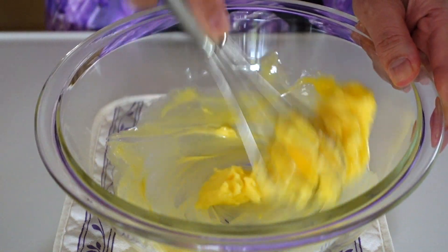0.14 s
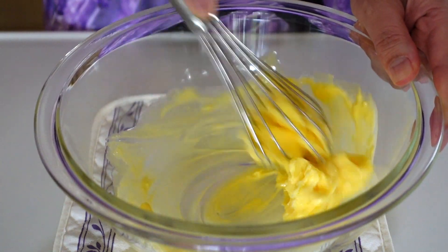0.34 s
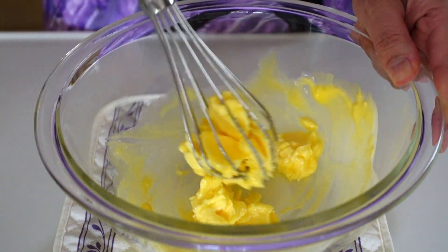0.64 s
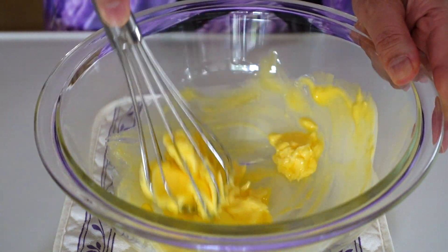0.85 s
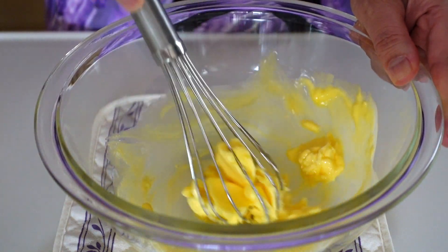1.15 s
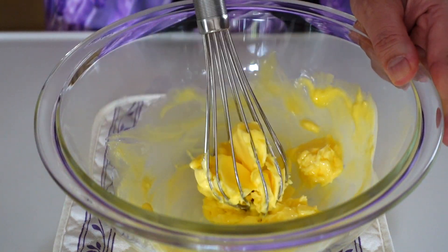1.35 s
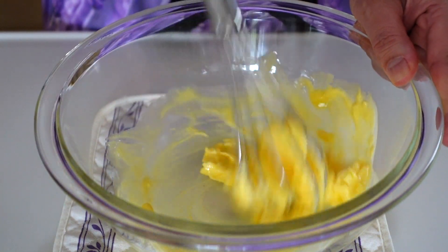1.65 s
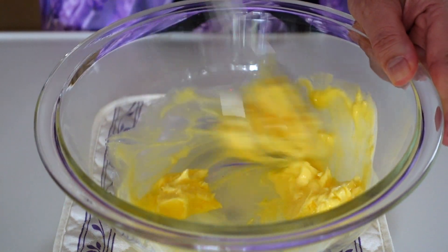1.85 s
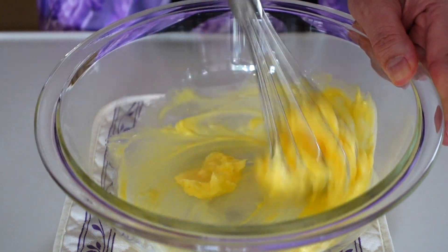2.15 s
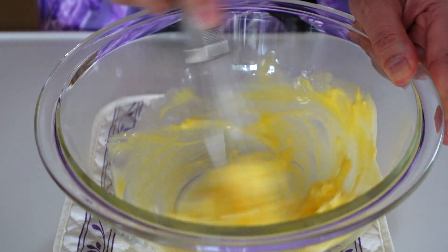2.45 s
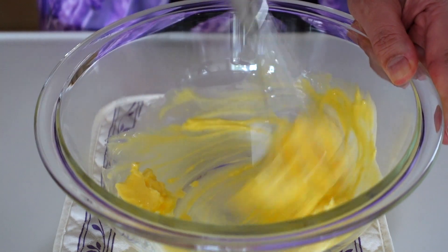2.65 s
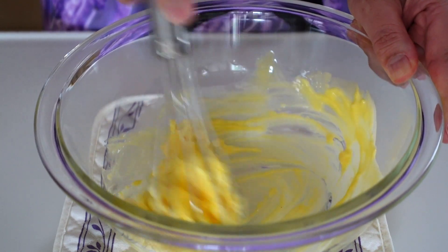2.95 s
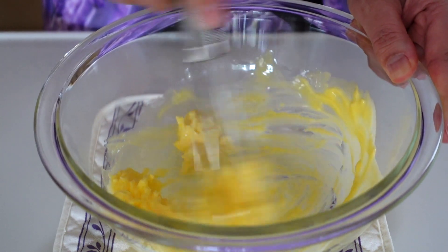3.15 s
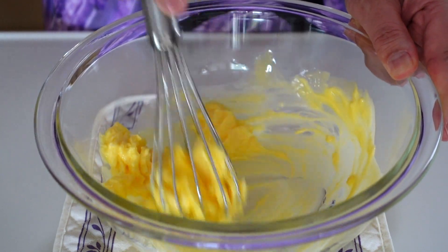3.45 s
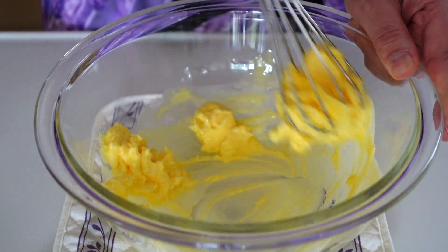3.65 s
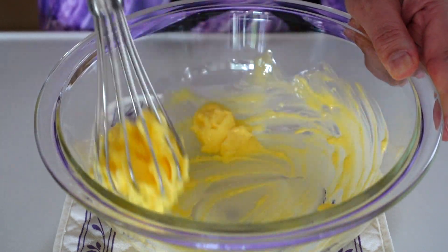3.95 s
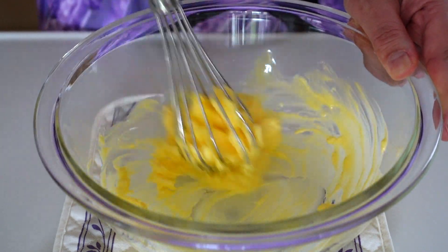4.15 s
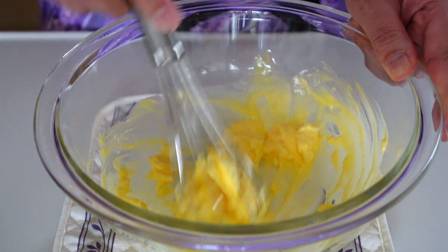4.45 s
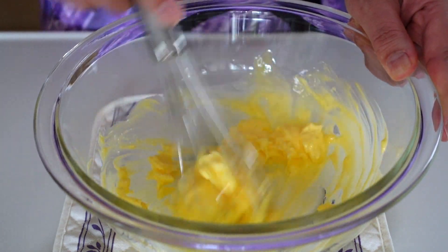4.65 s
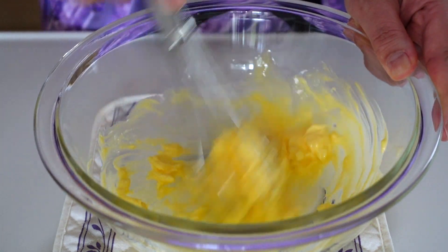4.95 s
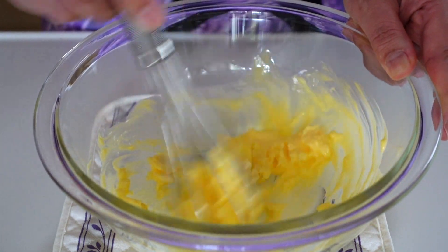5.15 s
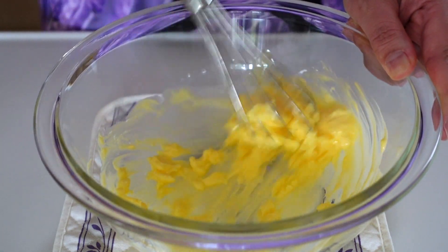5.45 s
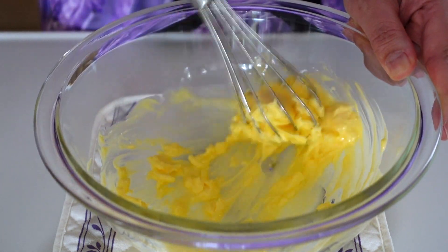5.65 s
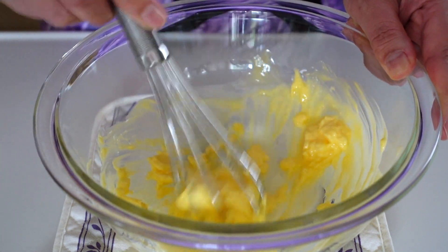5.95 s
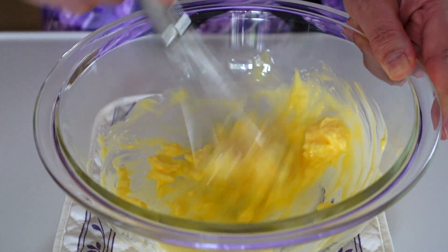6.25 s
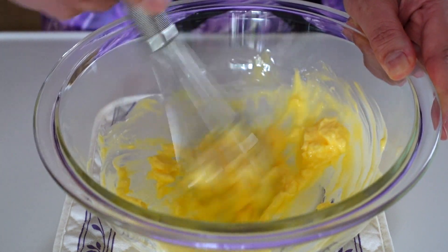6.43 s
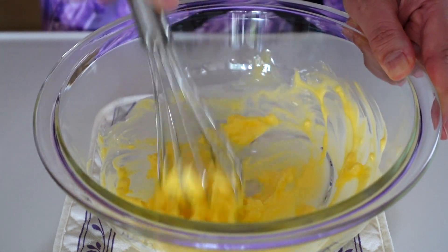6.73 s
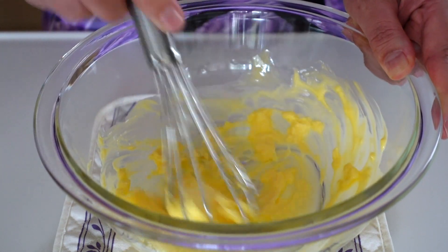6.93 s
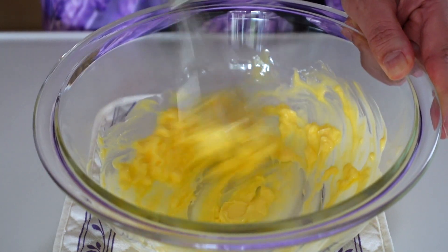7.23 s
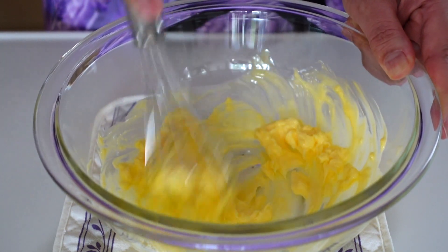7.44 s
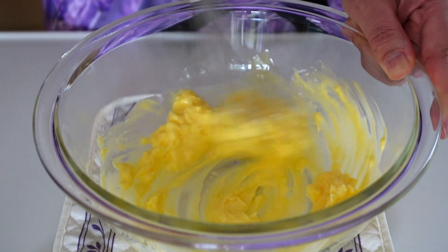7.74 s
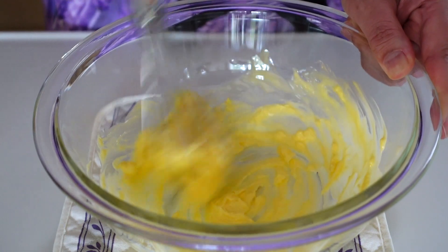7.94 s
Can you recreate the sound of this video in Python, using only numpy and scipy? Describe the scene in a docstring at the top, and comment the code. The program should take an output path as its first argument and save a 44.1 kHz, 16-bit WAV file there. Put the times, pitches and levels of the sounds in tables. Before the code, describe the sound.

Steel whisk beats butter in a glass bowl in quick bursts, with wet smearing, crackling pops, glassy knocks and one clear clink.

```python
"""First comes a soft kitchen hum with a faint tone, and at once a steel balloon whisk creaming butter in a glass bowl.
The wires smear and crackle: noise and tiny air pockets follow each sweep. Bigger pockets snap open and ring briefly.
The whisk rubs and knocks the glass, once with a clear clink: decaying bowl notes under a rattle of wire contacts.
The table shakes dully through a cloth mat and thumps at the hardest shoves; reflections surround the bowl's sound."""
import sys
import numpy as np
from scipy import signal
from scipy.fft import rfft, irfft, next_fast_len
from scipy.io import wavfile
from scipy.ndimage import uniform_filter1d, map_coordinates

SR = 44100
rng = np.random.default_rng(int(sys.argv[2]) if len(sys.argv) > 2 else 0)


def wrap_up_sound(samples):
    """Save the sound to the file named by the first command line argument, as 16-bit audio."""
    columns = np.atleast_2d(samples).T
    # keep every value between -1 and 1, then stretch to whole-number steps
    tamed = np.clip(columns, -1, 1)
    steps = np.round(tamed * 32767).astype(np.int16)
    wavfile.write(sys.argv[1], SR, steps)


N = 356769


def amp(db):
    """Turn decibels into a gain."""
    return 10 ** (np.asarray(db) / 20)


def unit(x):
    """Scale to an average strength (rms) of 1."""
    return x / np.sqrt(np.mean(x ** 2) + 1e-20)


def along(points, hz):
    """Read (Hz, value) points at any frequency, on a log axis."""
    f, v = np.transpose(points)
    return np.interp(np.log(hz + 1), np.log(f + 1), v)


def wobble(rate):
    """A smooth random curve with this many random points a second."""
    return map_coordinates(rng.standard_normal(8192), [np.arange(N) * rate / SR], mode="wrap")


def filtered(x, response):
    """Shape a sound by a gain that depends on frequency."""
    size = next_fast_len(N + SR // 4)
    hz = np.fft.rfftfreq(size, 1 / SR)
    return irfft(rfft(x, size) * response(hz), size)[..., :N]


def coloured(x, spectrum):
    """Give a sound a spectrum of (Hz, dB) points, at rms 1."""
    return unit(filtered(x, lambda hz: amp(along(spectrum, hz))))


def placed(times, sounds):
    """Add up short sounds, one per row, at their start times in seconds."""
    at = np.round(np.abs(times) * SR).astype(int)[:, None] + np.arange(sounds.shape[1])
    return np.bincount(at.ravel(), sounds.ravel(), N)[:N]


def resonance(f, centre_hz, width_hz):
    """The response of one resonance, with a peak gain of 1."""
    spread = 1j * f * width_hz
    return spread / (centre_hz ** 2 - f ** 2 + spread)


def ringing(modes, gains_db, t):
    """Decaying notes of slightly random strength; the moving whisk and butter unsettle their pitch."""
    hz, level, t60 = np.transpose(modes)
    strength = amp(level + gains_db + rng.standard_normal(len(hz)))
    unsteady, drift_rate = .005, 130  # share of the pitch, changes a second
    knots = rng.standard_normal((len(hz), 128))
    drift = np.array([np.interp(t * drift_rate, np.arange(128), row) for row in knots])
    cycles = np.cumsum(hz[:, None] * (1 + unsteady * drift), axis=1) / SR
    cycles = cycles + rng.random((len(hz), 1))  # random starting phase
    fade = amp(-60 * t / t60[:, None])
    return strength @ (fade * np.sin(2 * np.pi * cycles))


def swells(times, levels_db, length_s, skew):
    """Power of overlapping movements that build and die away; a skew above 1 makes the fall slower than the rise."""
    t = np.arange(0, N, 32) / SR  # a coarse time grid is enough
    power = 1e-12
    for s, db, length in zip(times, levels_db, np.broadcast_to(length_s, len(times))):
        age = 2 * (t - s) / length * np.where(t < s, skew, 1 / skew)
        power = power + (amp(db) / np.cosh(np.clip(age, -20, 20))) ** 2
    return np.interp(np.arange(N) / SR, t, power)


# Steady kitchen air. Each row: pitch in Hz, relative strength in dB per Hz.
HUM_COLOUR = [(15, -84), (25, -49), (70, -24.5), (165, -7.5), (200, -8.5), (372, -6.5), (418, -6.5),
              (667, -9), (707, -8), (1200, -5), (1480, -3), (1630, -13.5), (2020, -6), (2270, -19),
              (2600, -73), (3380, -81), (5720, -120)]
# The faint hiss. Each row: pitch in Hz, relative strength in dB per Hz.
HISS_COLOUR = [(1000, -33), (2400, 7.5), (4300, 5), (8000, -1), (12000, -6), (15000, -7.5), (16000, -10)]
# How alike the two ears are. Each row: pitch in Hz, likeness (1 same, 0 unrelated, negative opposed).
EAR_LIKENESS = [(60, 0.92), (150, 0.27), (380, 0.24), (950, -0.32), (2400, -0.14), (6000, 0.051),
                (15000, 1)]


def background(hum_db=-61.0, hiss_db=-70.0):
    """Steady kitchen ventilation and a faint hiss: two noises mixed to be partly alike in both ears."""
    hum = amp(hum_db) * coloured(rng.standard_normal((2, N)), HUM_COLOUR)
    hiss = amp(hiss_db) * coloured(rng.standard_normal((2, N)), HISS_COLOUR)

    def shares(hz):
        turn = np.arccos(np.clip(along(EAR_LIKENESS, hz), -1, 1)) / 2
        return np.array([np.cos(turn), np.sin(turn)])

    mid, side = filtered(hum + hiss, shares)
    return np.array([mid + side, mid - side])


# The appliance tone's level, before its waver. Each row: time in seconds, level in dB.
DRONE_LEVEL = [(0, -75.5), (1.7, -71), (2.8, -79), (4.8, -99), (6.2, -75.5), (8, -98)]


def drone(hz=420, waver_db=3.5):
    """A faint appliance tone: a sine whose level and phase wander slowly."""
    s, level_db = np.transpose(DRONE_LEVEL)
    db = np.interp(np.arange(N) / SR, s, level_db)
    phase = 2 * np.pi * hz * np.arange(N) / SR + 1.5 * wobble(6)
    return amp(db + waver_db * wobble(4.95)) * np.sin(phase)


# Sweeps of the wires through the butter, about ten a second when beating.
# Each row: time of the peak in seconds, level in dB, length in seconds, treble over body in dB.
SWEEPS = [(0.01, -56.5, 0.054, 9.5), (0.135, -61, 0.09, 14), (0.232, -58.5, 0.059, 8),
          (0.363, -59.5, 0.043, 14), (0.44, -59.0, 0.075, 2), (0.541, -67.5, 0.071, -10),
          (1.54, -73, 0.083, 6), (1.706, -58, 0.045, 5), (1.869, -62.5, 0.049, 14), (1.949, -58, 0.054, 8),
          (2.126, -59, 0.061, 6), (2.216, -52, 0.045, -3), (2.345, -56, 0.036, 0.5),
          (2.393, -60.5, 0.039, -4), (2.495, -53, 0.042, 2), (2.59, -58, 0.03, 3), (2.665, -56, 0.042, -4),
          (2.724, -55.5, 0.031, 8), (2.832, -53.5, 0.034, 16.5), (2.96, -47.5, 0.036, -1),
          (3.056, -53.5, 0.054, 8.5), (3.174, -49.5, 0.063, 3), (3.291, -59.5, 0.045, 10),
          (3.347, -56.5, 0.036, -14), (3.397, -53.5, 0.063, 5), (4.251, -63.5, 0.063, 2),
          (4.342, -67.5, 0.018, 15), (4.456, -54, 0.054, 4), (4.572, -53.5, 0.045, 14),
          (4.635, -55.5, 0.036, 4), (4.741, -60, 0.027, -12), (4.838, -50.5, 0.033, -3),
          (4.894, -54, 0.036, -20), (5.014, -52, 0.036, 0), (5.083, -50, 0.036, 5),
          (5.184, -46.5, 0.036, 0.5), (5.264, -56.5, 0.041, -13), (5.39, -56, 0.045, -4),
          (5.467, -52.5, 0.045, -1), (5.58, -56, 0.036, 4), (5.667, -52.5, 0.03, 3.5),
          (5.77, -51.5, 0.045, -1.5), (5.876, -52.5, 0.042, -8), (5.946, -56.5, 0.036, -4),
          (6.073, -57.5, 0.049, 3.5), (6.144, -61, 0.036, 6), (6.206, -56.5, 0.036, -2),
          (6.322, -57, 0.033, -1), (6.404, -54.5, 0.032, 1), (6.496, -54, 0.04, -9), (6.585, -55, 0.036, 1),
          (6.695, -55.5, 0.045, 5), (6.829, -55.5, 0.039, 6), (6.936, -51, 0.054, -9.5),
          (7.057, -51.5, 0.054, 2), (7.164, -53.5, 0.031, 7), (7.286, -56.5, 0.039, 3),
          (7.367, -54, 0.032, 3), (7.425, -55, 0.027, -20), (7.523, -53, 0.032, 4.5),
          (7.638, -54, 0.045, -5), (7.777, -51, 0.036, 0), (7.888, -49.5, 0.045, -1),
          (7.986, -50.5, 0.045, -1), (8.073, -59, 0.045, -6)]


def sweeping(skew=0.92, cling_db=-15.5, cling_s=.2):
    """Each sweep drags the butter, which clings to the wires around it: drag and brightness in dB over time."""
    s, db, length, bright_db = np.transpose(SWEEPS)

    def power(level):
        return swells(s, level, length, skew) + swells(s, level + cling_db, cling_s, skew)

    drag, treble = power(db), power(db + bright_db)
    return 10 * np.log10([drag, treble / drag])


def cavity(hz, life, glide, size):
    """Small air cavities, one per row: they swell to 1, can glide up in pitch and die within a few cycles."""
    cycles = hz[:, None] * np.arange(size) / SR
    age = cycles / np.maximum(life, .4)[:, None]
    swell = (age / 2) ** 2 * np.exp(2 - age)
    return swell * np.sin(2 * np.pi * cycles * (1 + glide * np.tanh(age / 2 - 1)))


def softened(x, low_hz=900, high_hz=12500):
    """Tiny sources radiate little bass, and grease dulls the very top."""
    return filtered(x, lambda f: (1j * f / (1j * f + low_hz)) ** 2 / (1 + (f / high_hz) ** 10))


def patchy(depth_db):
    """Noise whose colour shifts from moment to moment, as gaps of every size open and close."""
    z = signal.stft(rng.standard_normal(N), nperseg=256)[2]
    field = uniform_filter1d(rng.standard_normal(z.shape), size=7, axis=0)  # smooth over pitch
    field = uniform_filter1d(field, size=4, axis=1)  # smooth over time
    return signal.istft(z * amp(depth_db * unit(field)), nperseg=256)[1][:N]


# The glass bowl, damped by butter and a hand.
# Each row: note in Hz, relative level in dB, seconds to fade by 60 dB.
BOWL_NOTES = [(490, -15, .09), (560, -10, .12), (680, -15, .06), (785, -10, .14), (915, -11, .06),
              (1180, -9, .06), (1470, -6, .04), (1590, -10, .028), (1740, -10, .03), (1986, -12, .035),
              (2800, -16, .025), (3270, -15, .035), (3720, -4, .04), (4414, -17, .025), (5350, -13, .025),
              (5900, -16, .025), (7000, -14, .03), (8030, -14, .04), (8770, -13, .04), (9595, -12, .045),
              (10420, -19, .035), (11400, -14, .035)]


def through_glass(x):
    """Scraping stirs the bowl's notes above 4 kHz, which tint the sound faintly."""
    glass_db, width_hz = -10, 140
    notes = [(hz, db) for hz, db, t60 in BOWL_NOTES if hz > 4000]
    glass = filtered(x, lambda f: sum(amp(db) * resonance(f, hz, width_hz) for hz, db in notes))
    return unit(x + amp(glass_db) * unit(glass))


# Colour of the wet hiss. Each row: pitch in Hz, relative strength in dB per Hz.
SMEAR_COLOUR = [(900, -31), (1500, 3.5), (2000, 3), (2700, 0.5), (4300, 3), (6000, -6.5), (7500, -3.5),
                (9700, -3), (12500, -11), (14500, -14), (16000, -40)]


def smear(drag_db):
    """Wires tear through the butter: a fluttering wet hiss and a crackle of countless tiny pockets."""
    hiss_db, flutter_db, patchy_db = -3, 5.5, 2
    crackle_db, size_db, count = -1.0, 5.0, 3600
    grain_hz, spread = 5400, 0.25  # typical pocket pitch, its spread as a log ratio
    when = rng.uniform(0, N / SR, count)
    pitch = np.clip(grain_hz * np.exp(spread * rng.standard_normal(count)), 1500, SR / 4)
    big = np.minimum(rng.exponential(1, count), np.pi)
    life = rng.uniform(.3, .8, count)
    grains = cavity(pitch, life, glide=0, size=160) * amp(size_db * big)[:, None]
    crackle = unit(softened(placed(when, grains)))
    hiss = unit(coloured(patchy(patchy_db), SMEAR_COLOUR) * amp(flutter_db * wobble(110)))
    return amp(drag_db) * through_glass(amp(hiss_db) * hiss + amp(crackle_db) * crackle)


def small_pops(drag_db, over_db=11.5, pitch_hz=5500, spread=0.33, life=0.76, crowding=0.56, count=170):
    """Lesser pockets burst at random, more often and louder the harder the wires sweep."""
    tear_db, tear_hz, life_spread, size = -12, 10500, .35, 300
    swept = np.cumsum(amp(crowding * drag_db))
    share = (np.arange(count) + rng.random(count)) / count
    at = np.searchsorted(swept / swept[-1], share)  # harder sweeps take more of the pockets
    hz = np.clip(pitch_hz * np.exp(spread * rng.standard_normal(count)), 1500, SR / 4)
    lives = life * np.exp(life_spread * rng.standard_normal(count))
    ring = cavity(hz, lives, glide=0, size=size)
    tear = amp(tear_db) * cavity(np.full(count, tear_hz), np.full(count, .45), glide=0, size=size)
    return softened(placed(at / SR, (ring + tear) * amp(drag_db[at] + over_db)[:, None]))


def tilted(x, bright_db, pivot_hz=5300):
    """Thin films of butter tear brightly, thick lumps dully: treble and body tip about a pivot."""
    body = filtered(x, lambda hz: 1 / (1 + (hz / pivot_hz) ** 6))
    return body * amp(-bright_db / 2) + (x - body) * amp(bright_db / 2)


# The whisk bearing down on the bowl.
# Each row: time of the peak in seconds, rub on the glass in dB, push on the table in dB (before each sound's own gain).
BEARING_DOWN = [(.04, -62, -89), (.18, -67, -71), (.23, -55, -67.5), (.42, -56, -69.5), (1.67, -61.5, -88),
                (1.8, -58, -81), (2.72, -70, -77.5), (2.87, -60, -82), (3.02, -79, -69), (3.12, -56, -74),
                (3.25, -70, -71), (3.36, -55, -68), (4.21, -56.5, -75), (4.44, -61.5, -70),
                (4.54, -68, -72), (4.64, -60, -78), (4.88, -60, -72), (5.01, -79, -70), (5.18, -63, -66.5),
                (5.26, -66, -69), (5.36, -58.5, -75), (5.47, -62, -77), (5.55, -56, -75),
                (5.94, -59.5, -71), (6.13, -57.5, -78), (6.29, -59, -73), (6.45, -56, -72),
                (6.55, -61.5, -88), (6.95, -69, -65), (7.16, -59, -68), (7.364, -54.5, -66.5),
                (7.59, -57, -71.5), (7.69, -55, -67), (7.8, -66, -74), (7.905, -51.5, -60.5),
                (7.97, -56, -76), (8.05, -56.5, -70)]


def shoving(drag_db):
    """Shoves load the bowl, and every sweep adds a little: rub and table push in dB over time."""
    rub_s, push_s, push_lag_s, skew = 0.049, 0.066, 0.012, 1.6  # the table answers later and longer
    slide_rub_db, slide_push_db = -10, -28.5  # a sweep's own share, relative to its drag
    s, rub_db, push_db = np.transpose(BEARING_DOWN)
    rub = swells(s, rub_db, rub_s, skew) + amp(drag_db + slide_rub_db) ** 2
    push = swells(s + push_lag_s, push_db, push_s, skew) + amp(drag_db + slide_push_db) ** 2
    return 10 * np.log10([rub, push])


# Low resonances of the rubbed bowl. Each row: centre in Hz, width in Hz, relative level in dB.
RUB_RESONANCES = [(481, 36, -3.5), (684, 49, 0.5), (832, 69, -2), (1263, 72, -5.5), (1440, 890, -17),
                  (2310, 78, -12.5)]


def rubbing(rub_db, gain_db=-6.0, bump_db=3, slip_rate=170):
    """Greasy wires slide in small separate slips, many a second, that stir the low resonances of the bowl."""
    slips = (rng.random(N) < slip_rate / SR) * rng.choice([-1, 1], N) * amp(bump_db * rng.standard_normal(N))
    slips = signal.sosfilt(signal.butter(2, 420, "high", fs=SR, output="sos"), slips)

    def body(f):  # neighbouring resonances have opposite signs
        return sum((-1) ** k * amp(db) * resonance(f, hz, width)
                   for k, (hz, width, db) in enumerate(RUB_RESONANCES))

    return amp(rub_db + gain_db) * unit(filtered(slips, body))


# Colour of the shaken table. Each row: pitch in Hz, relative strength in dB per Hz.
TABLE_COLOUR = [(20, -51), (32, -45), (45, -12), (70, -0.5), (88, -0.5), (108, -16), (143, 5), (180, -1),
                (260, -9), (450, -73), (900, -90)]


def table(push_db, gain_db=-1):
    """The strokes shake the table dully through the mat: low noise that follows the push."""
    return amp(push_db + gain_db) * coloured(rng.standard_normal(N), TABLE_COLOUR)


def rattle(t, contact_rate=1100, uneven_db=4):
    """The wires meet the glass one after another: noise in a quick, uneven run of contacts, rms 1."""
    contacts = map_coordinates(rng.standard_normal(1024), [t * contact_rate], mode="wrap")
    return unit(rng.standard_normal(len(t)) * amp(uneven_db * contacts))


# Whisk against the bowl. Each row: start in seconds, level in dB, thud centre in Hz, thud in dB,
# rim note in dB, wire chatter in dB; the last three are relative to the level.
BOWL_KNOCKS = [(.034, -54, 750, 17.5, -17, -26), (.166, -46.5, 670, 18.5, -16, -7),
               (.223, -42, 700, -24, 0, -21), (2.632, -36.5, 545, 5, 0, 2),
               (2.636, -33.5, 1067, 13.5, -15, 2.5), (2.870, -31, 900, 4.5, -16, -3),
               (2.872, -45, 508, 11, -16, -10), (2.961, -34.5, 1690, -2, 4, 8.5),
               (3.120, -30.5, 732, 5.5, -22, 4.5), (3.193, -43, 1600, 12.5, 0.5, 9),
               (3.355, -34, 622, 3, -27, -5.5), (3.6748, -22.5, 1700, 3.5, 9, -8),
               (4.168, -51, 800, 9, -13, -2), (5.934, -45.5, 676, 12.5, -13, 10),
               (6.112, -44.5, 660, 10.5, -22, 2), (6.2875, -42, 670, 10.5, -15, -0.5),
               (6.454, -44.5, 660, 13, -17, -1), (6.931, -48, 1700, 7, -6, 5),
               (7.310, -44, 670, 17, 3, 0.5), (7.350, -51, 580, 15.5, -10, 2),
               (7.697, -43.5, 770, 9, -30, -11), (7.7957, -29, 1087, 11, -3, -2.5),
               (7.7975, -42.5, 560, 13, 0.5, -6), (7.901, -39.5, 1510, 5, -17, 2)]
# Notes that linger when the bare rim is struck.
# Each row: note in Hz, relative level in dB, seconds to fade by 60 dB.
RIM_NOTES = [(785, -17.5, .15), (1470, -8, .04), (1986, -14.5, .08), (3280, -19, .15), (3700, -21, .2),
             (3724, -13.5, .38), (3790, -21, .28), (5400, -13, .03), (8030, -19, .27), (8177, -21, .2),
             (8560, -20, .2), (8740, -18, .16), (9405, -23, .2), (9595, -21, .2), (11400, -18, .11),
             (12400, -19, .06)]


def knocks(ring_db=-5, chatter_db=-7, chatter_t60=0.014, linger_db=-5.5, focus=0.14, away_db=-20):
    """The place of contact picks the low notes that thud; the wires chatter; only a blow near the rim rings on."""
    hz = np.transpose(BOWL_NOTES)[0]
    t = np.arange(SR // 2) / SR
    wall, rim = hz < 2500, np.abs(hz - 3720) < 250
    rings, chatters = [], []
    for s, db, thud_hz, thud_db, rim_db, wires_db in BOWL_KNOCKS:
        near = np.exp(-(np.log(hz / thud_hz) / focus) ** 2)
        gains_db = wall * (thud_db + away_db * (1 - near)) + rim * rim_db
        body = amp(ring_db) * ringing(BOWL_NOTES, gains_db, t)
        linger = (rim_db > 0) * ringing(RIM_NOTES, linger_db, t)
        blow = amp(db) * (1 - np.exp(-t / 0.00042))  # a very quick onset
        rings.append(blow * (body + linger))
        chatters.append(blow * rattle(t) * amp(wires_db + chatter_db - 60 * t / chatter_t60))
    times = np.transpose(BOWL_KNOCKS)[0]
    no_bass = signal.butter(3, 330, "high", fs=SR, output="sos")  # the knocks carry no bass below about 330 Hz
    glass = signal.sosfilt(no_bass, placed(times, np.array(rings)))
    steel = [(300, -85), (1200, 10.5), (2500, 10.5), (4000, 17.5), (7000, 17.5),
             (10000, 8), (13000, -2), (16000, -15)]  # (Hz, dB)
    wires = filtered(placed(times, np.array(chatters)), lambda f: amp(along(steel, f)))
    return glass + wires


# The bigger air pockets snapping open. Each row: start in seconds, level in dB before a common gain,
# pitch in Hz, life in cycles (at least 0.4 is used), tearing tick in dB relative to the ring.
POCKETS = [(0.0727, -31, 8800, 0.54, -22), (.1501, -36, 7240, .6, -14), (.2072, -24.5, 5600, 0.46, -28),
           (.2228, -29, 7140, 1.1, -32), (0.296, -27, 8360, 0.62, -7), (0.3554, -33, 5840, 0.68, -26),
           (0.4016, -31, 6000, 0.59, -4), (0.414, -27.5, 7500, 0.4, -28), (.425, -33, 7980, .7, -22),
           (1.319, -53.5, 4370, 2, -28), (1.4574, -42, 6000, 0.92, -28), (1.5203, -35, 7200, 0.33, -7),
           (1.61, -38, 5440, 0.75, -26), (1.6867, -37, 7700, 0.81, -16), (1.7044, -26.5, 5960, .2, -11),
           (1.844, -29.5, 5100, 0.27, -2), (1.848, -35, 5070, 0.78, -25), (1.9231, -26.5, 5600, 0.34, -26),
           (1.9444, -26.5, 7460, .2, -30), (2.185, -32.5, 4600, 0.7, -30), (2.2191, -21, 4600, 0.67, -17),
           (2.3231, -21.5, 5300, 0.46, -17), (2.3259, -25.5, 5270, .2, -15),
           (2.3615, -30.5, 7400, 0.57, -14), (2.3798, -24.5, 4230, 0.8, -33),
           (2.456, -28.5, 5070, 0.49, -3), (2.4799, -16.5, 4900, 0.47, -22), (2.4978, -28, 3900, 0.37, -28),
           (2.572, -20.5, 8100, 0.55, -15), (2.5759, -26, 5970, .3, 0), (2.6242, -26, 6070, 0.36, -5),
           (2.6662, -27.5, 4500, 0.96, -28), (2.6888, -26, 6540, 1.05, -26), (2.716, -26.5, 5480, 0.36, -5),
           (2.904, -23, 10110, 0.33, -17), (2.9153, -22.5, 4970, 0.92, -25), (2.944, -29, 6150, 0.95, -15),
           (2.96, -18, 4300, 0.7, -15), (2.9603, -29, 1760, 0.79, -28), (3.0575, -26, 5330, 0.45, -32),
           (3.0683, -24.5, 3960, .25, -28), (3.095, -27, 5550, 0.69, -30), (3.1245, -21, 5200, .25, -15),
           (3.1512, -14, 4920, 0.77, -27), (3.192, -29.5, 1680, 1, -28), (3.351, -30, 5930, 0.81, -39),
           (3.741, -24, 8340, 0.44, -27), (3.7784, -30.5, 9900, 0.43, -12),
           (3.9546, -35.5, 7450, 0.48, -25), (4.192, -31, 7300, 0.26, -22), (4.3597, -21, 8400, 0.52, -29),
           (4.4658, -30.5, 4700, 0.28, -26), (4.5219, -22, 5950, 0.5, -32), (4.5437, -11.5, 4800, 1.35, -7),
           (4.5441, -13, 6560, 1.06, -14), (4.6114, -15.5, 5660, 0.73, -7), (4.6186, -17, 6900, 0.36, -1),
           (4.6438, -24.5, 5900, 0.82, -26), (4.6905, -32.5, 4630, 1, -28),
           (4.7498, -24.5, 6800, 0.18, -35), (4.804, -22.5, 5600, 0.55, -34),
           (4.8113, -8.5, 5530, 0.18, -14), (4.8437, -14, 5400, 0.45, -11), (4.887, -33, 2070, .3, -8),
           (4.909, -16.5, 5140, 0.53, -17), (4.953, -31, 4650, 1.4, -33), (4.9842, -21, 4800, 0.33, -15),
           (4.999, -13.5, 7340, 0.17, -42), (5.057, -23.5, 4500, 0.76, -32),
           (5.0907, -10, 4430, 0.49, -11.5), (5.092, -25.5, 3040, 0.77, -28), (5.159, -36, 2100, 0.37, -20),
           (5.177, -19.5, 4770, 0.19, -30), (5.19, -18.5, 5470, 0.22, -37), (5.249, -25.5, 5560, 0.33, -10),
           (5.264, -24, 7640, 0.37, -10), (5.2754, -22.5, 6500, 0.33, -31),
           (5.3608, -20.5, 6270, 0.34, -25), (5.393, -26, 7000, 0.95, -5), (5.5514, -35, 5160, 0.8, -16),
           (5.59, -28.5, 5500, 0.84, -26), (5.746, -32, 3380, 0.8, -20), (5.851, -18.5, 5060, 0.28, -28),
           (5.8636, -12, 5100, 0.87, 1.5), (5.8681, -13, 3480, 0.47, -26), (5.9432, -26, 3700, 0.34, -28),
           (6.0412, -21, 4930, 0.73, -35), (6.0636, -24, 4040, 0.83, -28), (6.158, -32, 6140, 1, -25),
           (6.207, -43, 2280, 0.3, -3), (6.374, -32.5, 5500, .35, -26), (6.3813, -28, 3000, .25, -20),
           (6.3873, -28, 3750, 0.36, -9), (6.4763, -33, 4140, 0.31, -28), (6.503, -34, 3740, 0.73, -33),
           (6.565, -22.5, 6300, 0.66, -11), (6.572, -30.5, 4150, 0.81, -28), (6.7004, -31, 1730, 0.66, -25),
           (6.8287, -34, 6000, 0.69, -19), (6.833, -34, 4950, 0.41, -13), (6.869, -36, 4420, 0.86, -23),
           (6.934, -29.5, 3180, 0.85, -28), (7.047, -28.5, 4030, 0.88, -28), (7.0696, -26, 5470, 0.35, -30),
           (7.1216, -29.5, 5600, 0.61, -22), (7.3485, -21, 2740, 0.23, -16), (7.356, -33, 2710, 0.94, -28),
           (7.3625, -32, 2760, 0.66, -24), (7.4174, -24, 7900, 0.39, -8), (7.4896, -24, 4730, 0.35, -28),
           (7.526, -25.5, 3860, 0.66, -3), (7.5954, -29, 5560, 1.2, -28), (7.6505, -24, 5550, 0.62, 4),
           (7.737, -28, 4060, 0.44, -21), (7.7693, -22.5, 5600, 0.6, -26), (7.8674, -31.5, 7040, 1.4, -14),
           (7.881, -29.5, 3000, 0.4, -2), (7.934, -36.5, 1880, 0.42, -15), (7.9802, -29.5, 4230, 0.23, -31),
           (7.9806, -32, 2210, 0.34, -20)]


def pops(glide=0.012, upper_db=-13, upper_ratio=1.484, tear_hz=10500, push_db=-23, gain_db=-2.01):
    """Each pocket rings at its own pitch and a weaker higher one, with a film-tearing tick and a push on the glass."""
    second_s, second_db = 0.00064, -10.5  # the film gives way in two steps
    size = 400
    s, db, hz, life, tear_db = np.transpose(POCKETS)
    luck = rng.standard_normal((len(s), 3))
    tear = cavity(tear_hz * np.exp(0.02 * luck[:, 0]), np.full(len(s), .45), glide, size)
    upper_hz = np.minimum(hz * upper_ratio * np.exp(0.081 * luck[:, 1]), SR / 4)
    upper = cavity(upper_hz, life * upper_ratio, glide, size)
    ring = cavity(hz, life, glide, size) + amp(upper_db) * upper
    push = amp(push_db) * cavity(hz * 0.422, life * 0.28, glide, size)
    strength = amp(db + gain_db)[:, None]
    first = placed(s, strength * (ring + push + amp(tear_db)[:, None] * tear))
    second = placed(s + second_s * np.exp(0.32 * luck[:, 2]), strength * amp(second_db) * ring)
    return softened(first + second)


# The hardest shoves thump the bowl down on its mat. Each row: start in seconds, level in dB.
MAT_THUMPS = [(2.968, -59), (3.197, -52.5), (3.365, -62), (3.445, -63), (6.944, -68), (7.365, -59),
              (7.899, -56)]
# The table top. Each row: note in Hz, relative level in dB, seconds to fade by 60 dB.
TABLE_NOTES = [(64, -4, 0.13), (90, 3, .14), (149, 0, 0.15), (178, -3, 0.13)]


def thumps(cushion_s=0.0073):
    """The mat cushions each thump, so the table's low notes swell softly and die quickly."""
    t = np.arange(SR // 3) / SR
    swell = (1 - np.exp(-t / cushion_s)) ** 2
    booms = [amp(db) * swell * ringing(TABLE_NOTES, 0, t) for s, db in MAT_THUMPS]
    return placed(np.transpose(MAT_THUMPS)[0], np.array(booms))


# How long the kitchen rings. Each row: pitch in Hz, seconds to fade by 60 dB.
KITCHEN_FADE = [(200, 1), (1000, 0.74), (4000, 0.44), (8000, 0.41), (15000, 0.82)]


def room_answer(tail_db=-9.0, width=0.4, scatter_db=-11, scatter_s=0.0035, echo_db=-18, echo_s=.0066):
    """Direct sound, quick scatter inside the bowl, one echo from a nearby surface and the kitchen's tail."""
    hz, frames, z = signal.stft(rng.standard_normal((2, SR // 2)), SR, nperseg=256)
    fade = amp(-60 * frames / along(KITCHEN_FADE, hz)[:, None])
    tail = signal.istft(z * fade, SR, nperseg=256)[1]
    t = np.arange(tail.shape[1]) / SR
    tail = tail * (1 - np.exp(-t / 0.0014))
    scatter = rng.standard_normal(tail.shape) * np.exp(-t / scatter_s) * (t > .0006)
    tail = amp(tail_db) * tail / np.linalg.norm(tail[0])
    mid, side = tail + amp(scatter_db) * scatter / np.linalg.norm(scatter[0])
    mid[0] += 1  # direct sound
    mid[round(echo_s * SR)] += amp(echo_db)
    return np.array([mid + width * side, mid - width * side])


def kitchen(x, spread_db=-13, spread_hz=8500):
    """The whisk keeps moving, so each quarter second of sound meets a new pattern of reflections."""
    out, size = np.zeros((2, N + SR)), SR // 4
    for start in range(0, N, size):
        wet = signal.fftconvolve(x[None, start:start + size], room_answer(), axes=1)
        out[:, start:start + wet.shape[1]] += wet
    # the shortest waves reach the two microphones out of step
    side = amp(spread_db) * filtered(x, lambda f: 1j * f ** 4 / (f ** 4 + spread_hz ** 4))
    return out[:, :N] + np.array([side, -side])


# Stereo balance of the bowl. Each row: pitch in Hz, left minus right in dB.
BALANCE = [(200, 10), (600, -4.5), (1300, -1.5), (2800, -1), (5500, -1), (9500, 0), (13000, 1)]


def scene():
    """The bowl stands a little to the right of the microphones; table, air and tone are added around it."""
    drag_db, bright_db = sweeping()
    rub_db, push_db = shoving(drag_db)
    butter = tilted(smear(drag_db) + small_pops(drag_db), bright_db)
    bowl = kitchen(butter + knocks() + rubbing(rub_db) + pops())
    heard = filtered(bowl, lambda hz: amp(np.outer([.5, -.5], along(BALANCE, hz))))
    return background() + drone() + heard + table(push_db) + thumps()


def record(dry, top_hz=16200):
    """Keep only the sound below the top frequency."""
    return filtered(dry, lambda hz: hz < top_hz)


dry = scene()
out = record(dry)
wrap_up_sound(out)
```